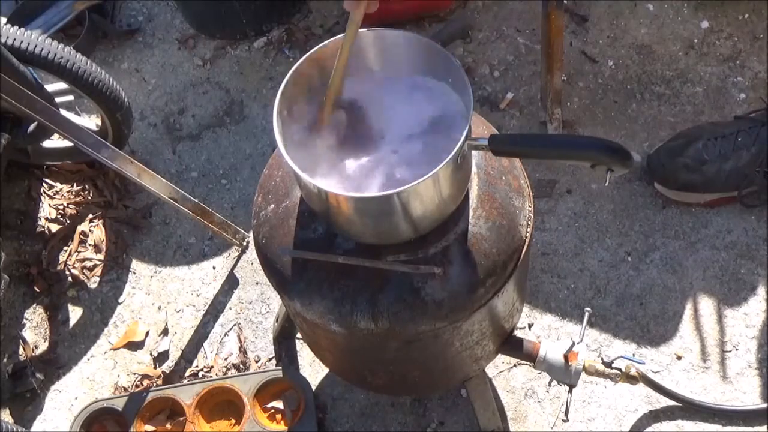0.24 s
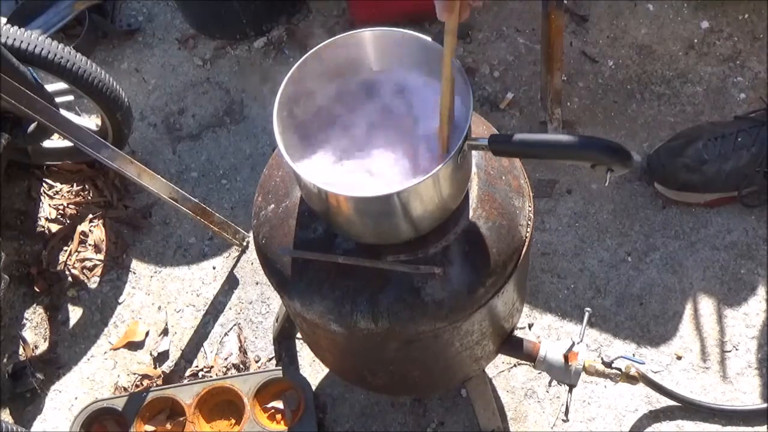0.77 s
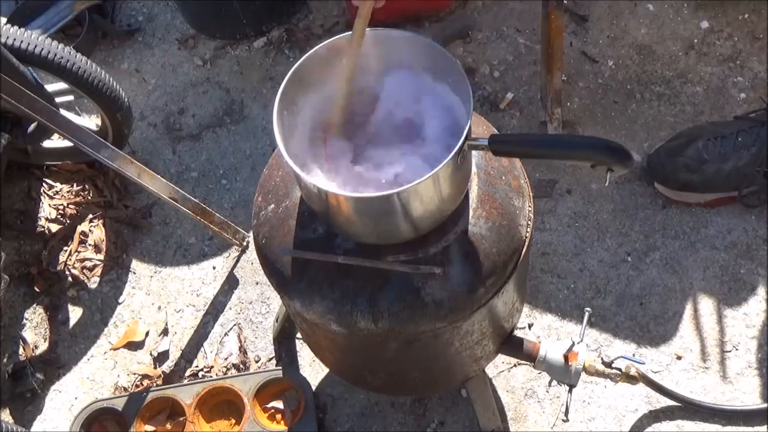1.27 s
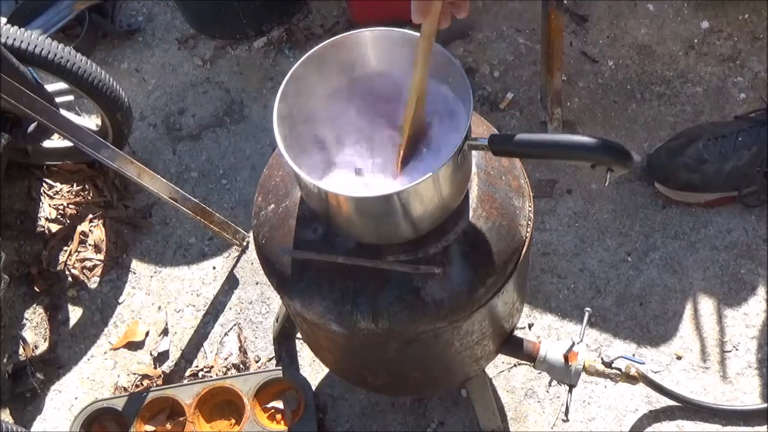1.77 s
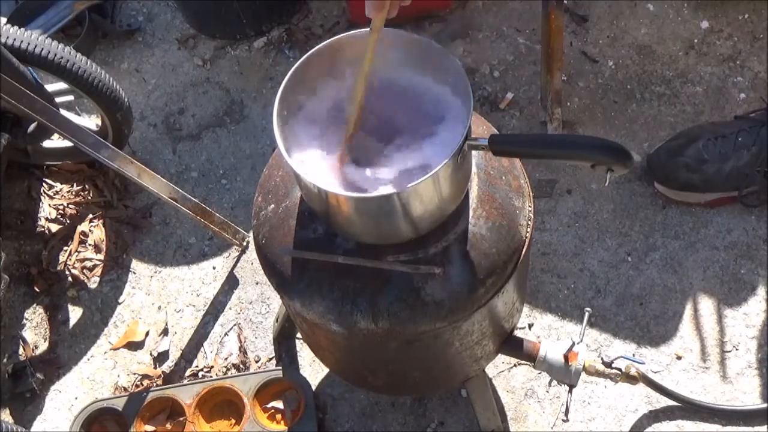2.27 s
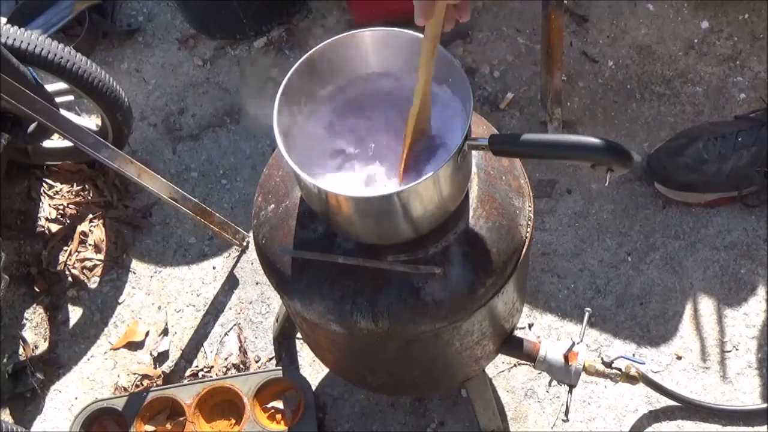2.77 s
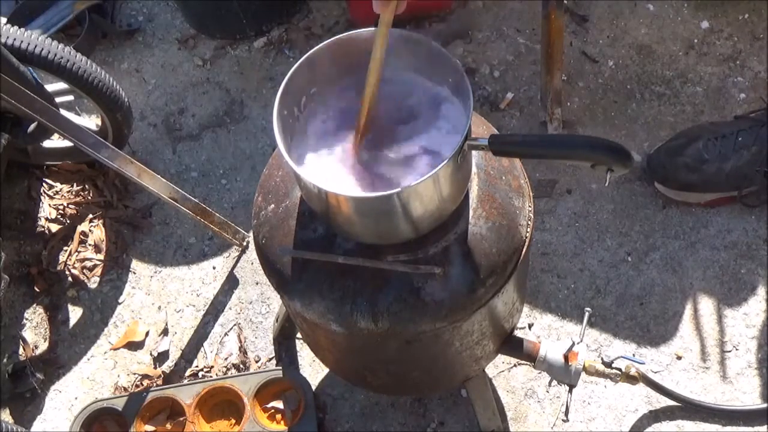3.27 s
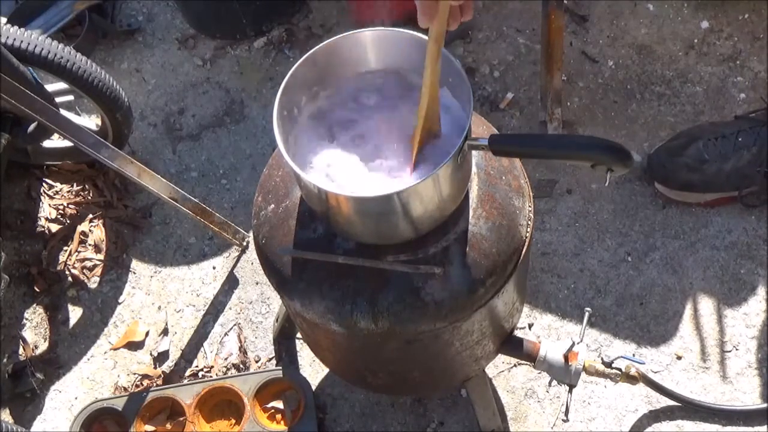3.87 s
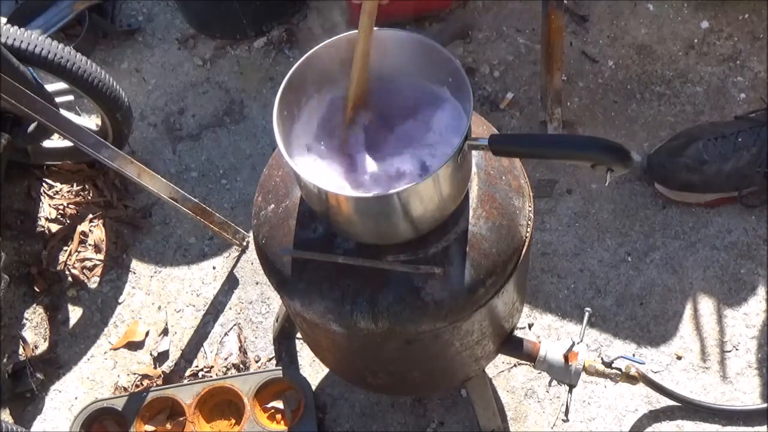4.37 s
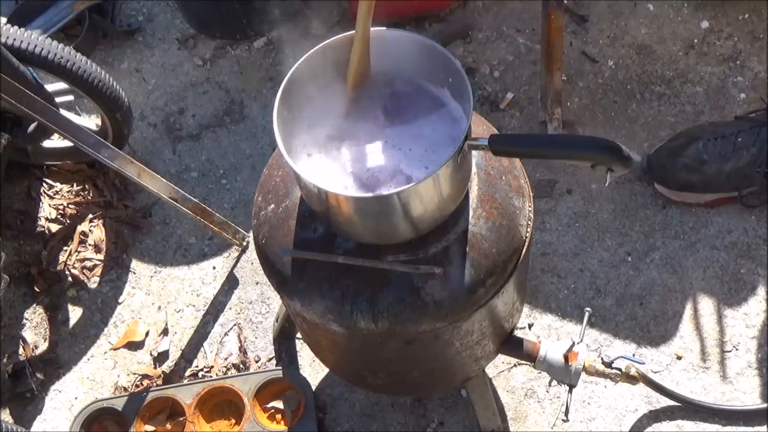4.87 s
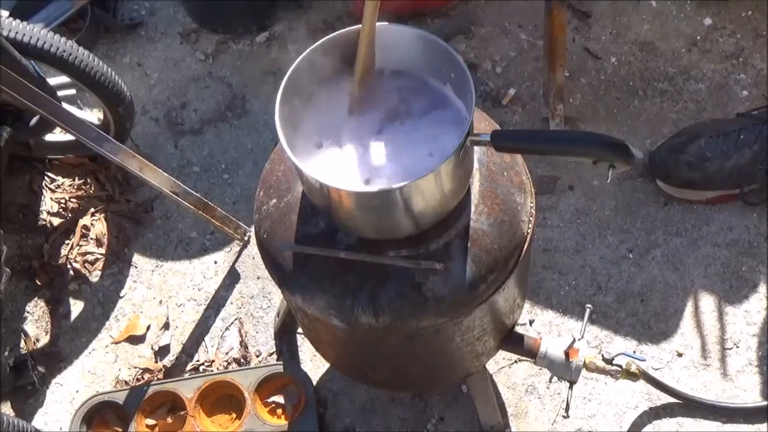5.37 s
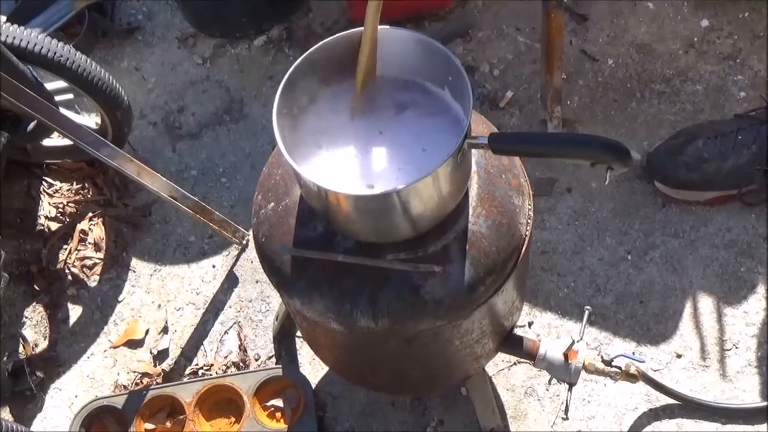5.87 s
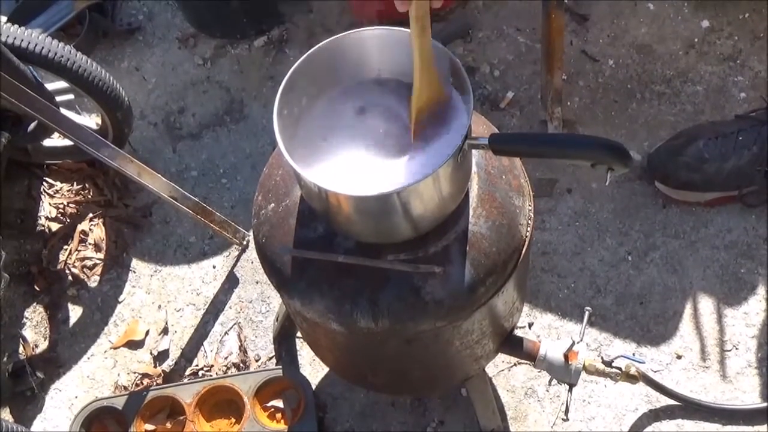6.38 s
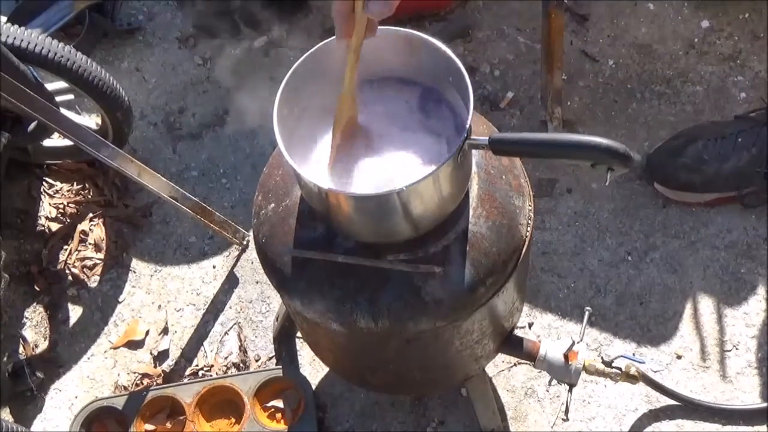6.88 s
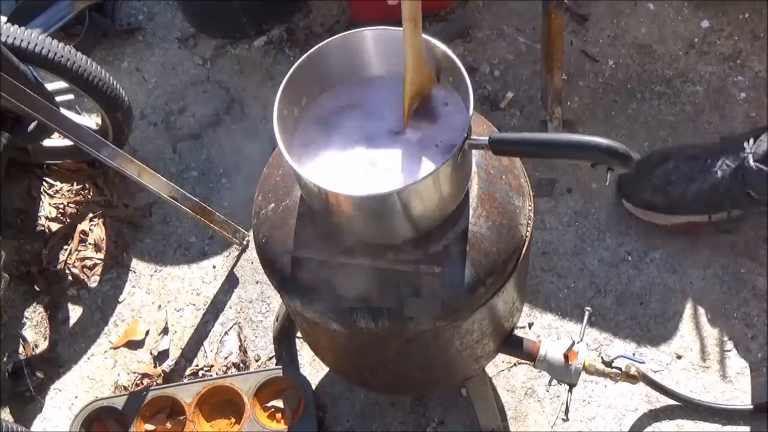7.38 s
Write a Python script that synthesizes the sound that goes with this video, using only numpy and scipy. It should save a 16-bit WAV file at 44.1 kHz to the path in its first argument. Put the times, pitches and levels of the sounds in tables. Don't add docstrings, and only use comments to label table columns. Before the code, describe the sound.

For about 7.6 seconds a propane burner roars continuously, close up and outdoors, slightly right of centre. Its turbulence makes a hollow, breathy howl around 1.2 kHz, with noisy metallic overtones, a low rumble that slowly fades, and a thin gas hiss. The roar flutters, and small pockets of flame pop alight irregularly throughout. From the start a wooden spoon drags in a saucepan with faint taps, some at 1.3 and 1.8 s. At 2.6 s it knocks the pan wall, with a dry snap at the same moment. Taps cluster from 3 s and are hardest around 4.4 s, then continue at 5.0 and 5.5 s. Sharp dry snaps crackle close by at 5.05-5.3 s. After about 6.3 s the upper tones sag lower, and short strokes scrape and sizzle more strongly, especially around 6.9-7.2 s, with another small snap near 7.24 s. The roar continues to the end.

```python
import sys
import numpy as np
from scipy import signal
from scipy.fft import rfft, irfft, next_fast_len
from scipy.io import wavfile
from scipy.ndimage import uniform_filter1d, map_coordinates

SR = 44100
rng = np.random.default_rng(int(sys.argv[2]) if len(sys.argv) > 2 else 0)


def natural_amplitude(level_db):
    exponent = np.asarray(level_db, float) / 20
    return 10 ** exponent


def transcribe(signal):
    frames = np.atleast_2d(signal).T
    limited = np.clip(frames, -1, 1)
    pcm = np.round(limited * 32767).astype(np.int16)
    wavfile.write(sys.argv[1], SR, pcm)


N = 336483

# (time [s], peak level [dB])
IGNITIONS = [(0.755, -0.5), (1.377, -7), (2.892, -1), (3.685, 1), (3.775, -4.5), (4.111, 1), (4.868, 1.5),
             (0.5405, 0), (0.5701, -1.5), (1.0966, 2), (1.873, 1), (3.0654, 0.5), (3.1148, 0), (3.2595, 1),
             (3.8638, 2), (3.896, -2), (3.9591, 1), (4.3199, -1), (4.4024, -4), (4.715, 0.5), (5.366, -7.5),
             (5.587, -5.5), (5.7929, -4), (6.2605, 2.5), (6.6284, 0.5), (7.4073, -0.5), (7.4598, 1.5),
             (7.5058, -6), (7.5372, 1)]


def unit(x):
    return x / np.sqrt(np.mean(x ** 2) + 1e-20)


def along(points, hz):
    f, v = np.transpose(points)
    return np.interp(np.log(hz + 1), np.log(f + 1), v)


def curves(rows):
    s, *cols = np.transpose(rows)
    return [np.interp(np.arange(N) / SR, s, c) for c in cols]


def wobble(rate):
    return map_coordinates(rng.standard_normal(1000), [np.arange(N) * rate / SR])


def filtered(x, response):
    m = next_fast_len(N + SR // 8)
    return irfft(rfft(x, m) * response(np.fft.rfftfreq(m, 1 / SR)), m)[..., :N]


def resonant(modes, steep):
    def gain(f):
        power = 0
        for center, width, db in modes:
            detuning = (center * center - f * f) / (width * f + 1)
            power = power + natural_amplitude(2 * db) * (1 + detuning ** 2) ** -steep
        return np.sqrt(power)
    return gain


def shaped(points):
    return lambda hz: natural_amplitude(along(points, hz))


def rush(gain, patchy_db, apart=1):
    # (frequency [Hz], correlation [0-1])
    alike = [(25, 1), (70, 0.97), (250, 0.92), (560, 0.68), (1190, 0.95), (2500, 0.58), (5300, 0.74),
             (11000, 0.72)]
    z = signal.stft(rng.standard_normal((2, N)), nperseg=512)[2]
    field = uniform_filter1d(rng.standard_normal(z.shape[1:]), size=5, axis=0)
    field = uniform_filter1d(field, size=8, axis=1)
    pair = signal.istft(z * natural_amplitude(patchy_db * unit(field)), nperseg=512)[1][:, :N]

    def mid_side_gain(hz):
        turn = apart * np.arccos(np.clip(along(alike, hz), -1, 1)) / 2
        return gain(hz) * [np.cos(turn), np.sin(turn)]

    mid, side = filtered(pair, mid_side_gain)
    return unit(np.array([mid + side, mid - side]))


def panned(x, db):
    return x * natural_amplitude(np.array([db / 2, -db / 2]))


def leaning(x):
    # (frequency [Hz], level difference [dB])
    lean = [(50, 0.7), (250, -1.7), (600, -1), (2500, -2.6), (5000, -2.5), (10000, -.8)]
    return filtered(x, lambda hz: panned(0.99, along(lean, hz)))


def add(track, s, sound):
    start = round(s * SR)
    part = track[..., start:start + sound.shape[-1]]
    part += sound[..., :part.shape[-1]]


def flame():
    # (time [s], strength [dB], depth in the drum [dB], left over right [dB])
    course = [(0, -20, 1, -3.5), (.45, -23, 0.5, -4.5), (1.15, -19, -3, -4), (1.52, -24, 1.5, -5),
              (1.85, -21, -3, -4.4), (2.45, -20, -3, -4), (2.75, -23.5, 1.5, -4.3), (3.2, -19.5, -2.5, -4),
              (3.9, -21.5, 1.5, -3.5), (4.4, -23.5, 0.5, -1.5), (4.9, -20, -14.5, -4),
              (5.25, -24.5, -11, -7), (5.7, -23.5, -3, -6), (6.0, -21.5, -5, -2.5), (6.3, -23.5, 0.5, -3),
              (6.85, -25.5, 1.5, -0.5), (7.25, -20, 3, -2.5), (7.63, -25, 5.5, -8)]
    # (time [s], share [0-1])
    sag = [
        (0, 0.08),
        (3.5, 0.04),
        (3.8, 0.62),
        (4.2, 0.4),
        (4.6, 0.42),
        (5.2, 0.3),
        (5.6, 0.38),
        (6.3, 0.38),
        (6.6, 1),
        (7.63, 0.43),
    ]
    # (frequency [Hz], width [Hz], level [dB])
    tube = [(1181, 90, 13), (1110, 47, -1.5), (1440, 40, -41.5)]
    # (frequency [Hz], width [Hz], level [dB])
    drum_modes = [(1022, 205, 5.5), (800, 160, -12)]
    # (frequency [Hz], width [Hz], level [dB])
    skirt_modes = [(1370, 67, 0)]
    # (frequency [Hz], width [Hz], level [dB])
    overtones = [(1782, 55, -3), (1961, 116, 4), (2250, 234, -6), (3346, 265, -7), (3794, 110, -15.5),
                 (4330, 60, -7), (4290, 65, -3.5), (4590, 270, -7.5), (5713, 246, -15.5),
                 (6950, 180, -21.5), (7830, 260, -21.5), (8430, 250, -20), (10540, 78, -19)]
    # (frequency [Hz], width [Hz], level [dB])
    lowered = [(2002, 163, 3), (2220, 370, -3.5), (3340, 670, -6.5), (3630, 68, -22), (4360, 430, -5),
               (5360, 520, -15), (6170, 110, -20)]
    # (frequency [Hz], density [dB per Hz])
    deep_points = [(12, -48), (20, -24.5), (80, 0.5), (114, 3), (150, -2), (200, -11.5), (330, -120)]
    # (frequency [Hz], density [dB per Hz])
    body_points = [(65, -12), (110, -7.5), (182, 1.5), (258, -8), (339, -3), (401, -10), (445, -15),
                   (486, -9.5), (709, -11), (750, -4), (980, -4), (1650, -120)]

    strength_db, depth_db, pan_db = curves(course)
    flicker = 0.5 * wobble(18) + 1.2 * wobble(40)
    surge = 1 * wobble(8)
    turn = np.pi / 2 * np.clip(curves(sag)[0] + 0.12 * wobble(4.5), 0, 1)

    tone_db = strength_db + surge + flicker + lull()
    tone = natural_amplitude(tone_db) * rush(resonant(tube, steep=1.697), patchy_db=0.4, apart=0.89)

    drum_db = -31.5 + depth_db + 3.0 * wobble(12) + 0.14 * flicker
    drum = natural_amplitude(drum_db) * rush(resonant(drum_modes, steep=3.4), patchy_db=-0.4)
    skirt_db = -38.5 - 0.6 * depth_db + 1.25 * wobble(7.5) + 1.7 * flicker
    skirt = natural_amplitude(skirt_db) * rush(resonant(skirt_modes, steep=1.1), patchy_db=3.5)

    high = rush(resonant(overtones, steep=2.3), patchy_db=2.8, apart=0.75)
    low = rush(resonant(lowered, steep=2.3), patchy_db=2.8, apart=0.75)
    beading = 0.9 * flicker + 1.1 * wobble(16)
    over_db = -35 + 0.26 * (strength_db - strength_db.mean() + surge) + 0.27 * wobble(9.9)
    over = natural_amplitude(over_db + beading) * (np.cos(turn) * high + np.sin(turn) * low)

    deep_db = -36.5 - 0.65 * np.arange(N) / SR + 0.7 * wobble(6)
    deep = natural_amplitude(deep_db) * rush(shaped(deep_points), patchy_db=2.8)
    body_db = -32.5 + 0.9 * wobble(4) + 0.4 * flicker
    body = natural_amplitude(body_db) * rush(shaped(body_points), patchy_db=1.6)
    return panned(tone, pan_db) + panned(drum + skirt, np.array([[-3.3]])[0]) + leaning(over + deep + body)


def lull():
    t = np.arange(N) / SR
    return sum(-9.5 * np.exp(-((t - s - 0.001) / 0.0081) ** 2) for s, db in IGNITIONS)


def puffs():
    out, t = np.zeros(N), np.arange(SR // 20) / SR
    chance = rng.standard_normal((len(IGNITIONS), 2))
    for (s, db), (detune, phase) in zip(IGNITIONS, chance):
        shape = (1 - np.exp(-t / 0.0041)) * natural_amplitude(-60 * t / 0.027)
        hz = 1190 + 14 * detune
        add(out, s - 0.002, natural_amplitude(db + 2.5) * shape * np.sin(2 * np.pi * hz * t + 3 * phase))
    return panned(np.array([out, out]), np.full(N, -3.8))


def spoon():
    # (time [s], peak level [dB], ring [Hz], rasp re peak [dB])
    taps = [(0.175, -23, 2260, -13), (2.893, -26, 3770, -16), (1.3204, -13.5, 2150, -17.5),
            (1.4082, -20.5, 3350, -10), (1.5364, -33, 2370, -1), (3.7095, -30, 2390, -19),
            (1.8013, -17.5, 2340, -13), (2.2934, -29, 2340, 1.5), (2.795, -25.5, 2200, -3),
            (3.0696, -17.5, 3300, -13.5), (3.1774, -17.5, 3320, -12.5), (3.287, -23.5, 3500, -4),
            (3.8661, -20, 2440, -15), (3.9809, -17, 2280, -13), (4.1044, -13.5, 2240, -16),
            (4.2373, -16.5, 2250, -14), (4.351, -8, 2220, -21), (4.4772, -16.5, 2220, -23.5),
            (4.6305, -20, 2250, -6.5), (5.008, -12, 2260, -18.5), (5.4809, -16, 2280, -22),
            (5.5383, -11.5, 2170, -14), (5.8144, -14.5, 2130, -16), (5.9514, -21.5, 2130, -14),
            (6.2562, -15.5, 2220, -15), (6.336, -19, 2220, -10), (6.61, -16, 2240, -18),
            (7.03, -15, 3340, -26), (7.1944, -17, 3170, -13), (7.4704, -27, 2160, -4.5)]
    # (time [s], peak level [dB], strongest pitch [Hz])
    knocks = [
        (2.478, -33, 484),
        (2.613, -19.5, 750),
        (6.199, -30, 608),
    ]
    # (frequency [Hz], level [dB], decay by 60 dB [s])
    pan_wall = [(402, 12.5, 0.1), (573, 14.5, 0.042), (707, 17, 0.029)]
    out, t = np.zeros((2, N)), np.arange(4096) / SR
    hz_grid = np.fft.rfftfreq(4096, 1 / SR)

    for s, db, hz, rasp_db in taps:
        pair = np.sin(2 * np.pi * hz * t) + 0.43 * np.sin(2 * np.pi * 1.055 * hz * t)
        add(out, s, natural_amplitude(db - 5.0 - 60 * t / 0.031) * (1 - np.exp(-t / 0.0016)) * pair)
        rise = 0.013 * natural_amplitude(rng.normal(0, 2))
        swell = (t / rise) ** 2 * np.exp(2 - 2 * t / rise)
        grit = rng.standard_normal(len(t)) + 0.86 * rng.standard_normal((2, len(t)))
        modes = [(3000, 3600, -1.5), (3330, 450, 5), (4500, 550, 4)]
        modes += [(c, 800, -4) for c in rng.uniform(5000, 10500, size=3)]
        rasp = irfft(rfft(swell * grit) * resonant(modes, steep=1.2)(hz_grid))
        add(out, s - rise / 2, natural_amplitude(db + rasp_db - 4.0) * rasp)

    for s, db, hz in knocks:
        wall = np.zeros(len(t))
        for f, mode_db, t60 in pan_wall:
            struck_db = mode_db - 15.0 * abs(np.log(hz / f))
            wall += natural_amplitude(struck_db - 60 * t / t60) * np.sin(2 * np.pi * f * t)
        add(out, s, natural_amplitude(db - 4.0) * (1 - np.exp(-t / 0.0021)) * wall)
    return leaning(out)


def snaps():
    # (time [s], peak level [dB], low part re peak [dB], left over right [dB], brightest [Hz])
    cracks = [(1.256, -19, -10, -4, 8700), (1.715, -24, -14, 0, 10300), (2.613, -10.5, -8.5, 0, 5800),
              (2.9472, -17, -21, -4, 9100), (5.0389, -23, -5, -2, 9780), (5.0525, -9.5, -4, 9.5, 10000),
              (5.0641, -13, -2.5, -6, 9700), (5.2196, -24, -11, -7, 8840), (5.225, -22.5, -8.5, 19, 7810),
              (5.2615, -35, -6, 2, 8440), (5.2695, -16, 1, 2, 9050), (5.277, -27, 0, -5, 7220),
              (5.8152, -42, -1, 2, 8790), (7.24, -17, -2, -4, 5300), (7.2465, -20, -10, -1.5, 6200)]
    out, t = np.zeros((2, N)), np.arange(-128, 1920) / SR
    hz = np.fft.rfftfreq(2048, 1 / SR)
    decay = natural_amplitude(-60 * t / 0.007) + natural_amplitude(-26 - 60 * t / 0.08)
    shape = decay * np.clip(t / 0.0006, 0, 1)
    for s, db, low_db, pan_db, bright_hz in cracks:
        common = rng.standard_normal((2, 1, len(t)))
        crack = rfft(shape * (common + 0.45 * rng.standard_normal((2, 2, len(t)))))
        bright_modes = [(bright_hz, 1800, 0), (1.05 * bright_hz, 4500, -14)]
        bright = crack[0] * resonant(bright_modes, steep=1.4)(hz)
        dull = natural_amplitude(low_db + 10.5) * crack[1] * resonant([(3000, 3600, 0)], steep=1.2)(hz)
        gain = natural_amplitude(db + 3.0) * panned(0.81, np.array([pan_db]))
        add(out, s + t[0], gain * irfft(bright + dull))
    return out


def jet_and_strokes():
    # (time [s], length [s], scrape level [dB], sizzle level [dB])
    strokes = [(0, 0.36, -56, -70), (0.56, 0.38, -54, -62), (0.903, 0.34, -50.5, -49.5),
               (1.507, 0.59, -53, -67), (3.0, 0.35, -50, -53), (3.71, 0.39, -48.5, -54),
               (4.38, 0.056, -57, -69), (5.034, .1, -47, -46.5), (5.162, 0.095, -65, -51),
               (5.533, .25, -48, -69), (6.33, 0.12, -50, -45), (6.502, 0.084, -51, -44),
               (6.66, 0.18, -49, -48.5), (6.9, 0.16, -42.5, -49), (7.143, 0.051, -41.5, -50),
               (7.201, 0.056, -43, -47.5), (7.46, 0.046, -68, -69)]
    # (frequency [Hz], density [dB per Hz])
    jet_points = [(2500, -41), (4000, -9), (4700, -3), (5020, 4), (5400, 5.5), (6500, 9), (7500, 7.5),
                  (10000, 8), (11000, 4.5), (12000, -28)]
    # (frequency [Hz], density [dB per Hz])
    scrape_points = [(1200, -36), (1700, 3.5), (2750, -2), (4000, -4.5), (5000, -14.5), (7000, -18),
                     (12000, -45)]
    # (frequency [Hz], width [Hz], level [dB])
    pan_floor = [(432, 140, -1.5), (1460, 180, -0.5)]
    s, length, scrape_db, sizzle_db = np.transpose(strokes)[:, :, None]
    rise_s, fall_s = 0.039, 0.036
    t = np.arange(N) / SR - s
    power = np.clip(1 + t / rise_s, 0, 1) * np.clip(1 + (length - t) / fall_s, 0, 1)
    fizz = np.sqrt(natural_amplitude(2 * -51) + np.sum(natural_amplitude(2 * sizzle_db) * power, axis=0))
    drag = np.sqrt(natural_amplitude(2 * -56.5) + np.sum(natural_amplitude(2 * scrape_db) * power, axis=0))
    sway = 0.48 * wobble(12) + 0.26 * wobble(8.5)
    hiss_db = 1.2 + 0.7 * sway + 0.5 * wobble(45)
    hiss = fizz * natural_amplitude(hiss_db) * rush(shaped(jet_points), patchy_db=2)
    scrape = drag * natural_amplitude(1.1 * sway) * rush(shaped(scrape_points), patchy_db=1.6, apart=1.2)
    groan = drag * rush(resonant(pan_floor, steep=1.7), patchy_db=3.0)
    return leaning(natural_amplitude(-1.0) * hiss + natural_amplitude(6.0) * scrape + natural_amplitude(3.5) * groan)


def shadowed(x):
    # (frequency [Hz], width [Hz], depth [dB])
    shadows = [(918, 8.3, 3.5), (1048, 13, -0.5), (1960, 30, -1), (2080, 14, 10), (3800, 40, 3),
               (4310, 26, 16), (4960, 58, -2)]

    def dips(hz):
        return natural_amplitude(-sum(db * np.exp(-((hz - c) / w) ** 2) for c, w, db in shadows))

    return filtered(x, dips)


def scene():
    return shadowed(flame() + jet_and_strokes()) + puffs() + spoon() + snaps()


def top_cut(x):
    return signal.sosfilt(signal.butter(12, 11770, fs=SR, output="sos"), x)


def record(dry):
    def edge(hz):
        return np.where(hz < 11025, 1, natural_amplitude(-30 - 0.018 * (hz - 11025)))

    mix = filtered(dry, edge)
    return top_cut(mix)


dry = scene()
out = record(dry)
transcribe(out)
```